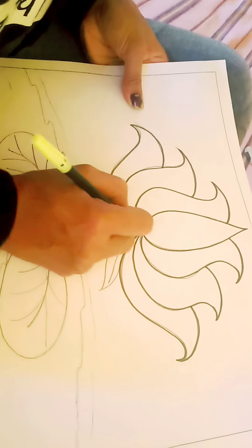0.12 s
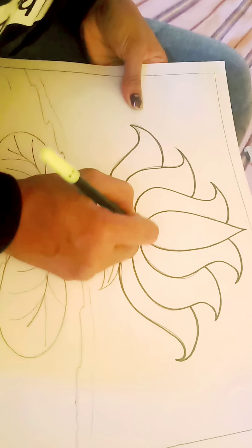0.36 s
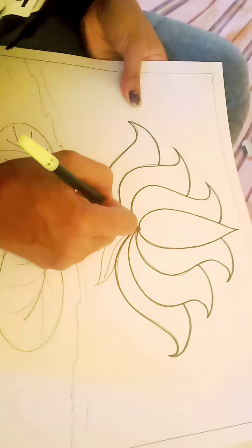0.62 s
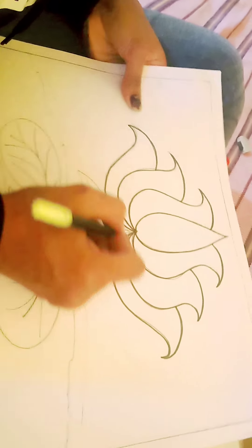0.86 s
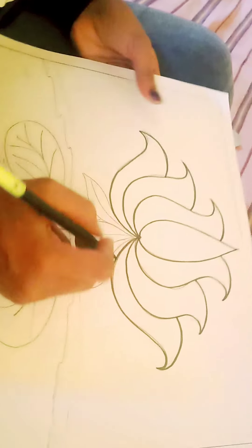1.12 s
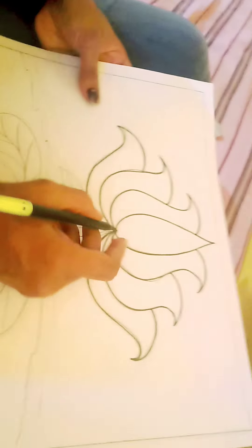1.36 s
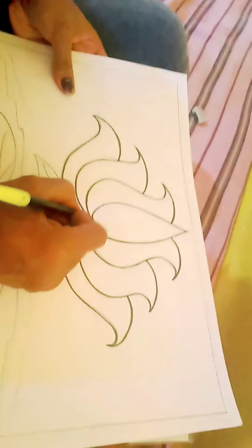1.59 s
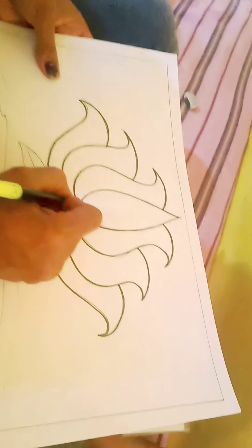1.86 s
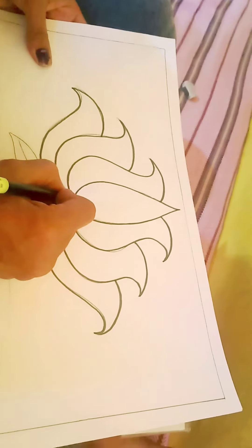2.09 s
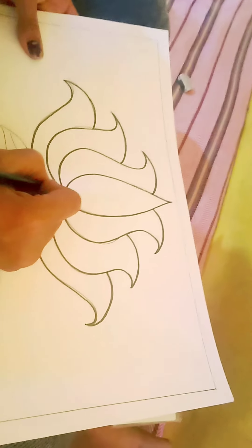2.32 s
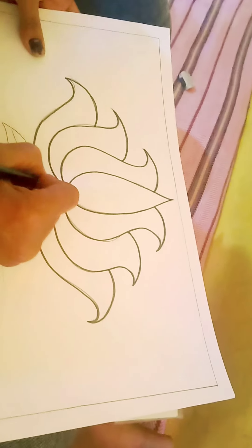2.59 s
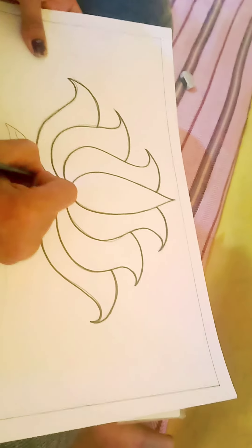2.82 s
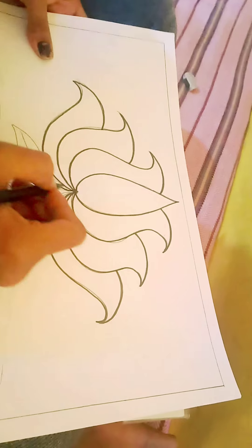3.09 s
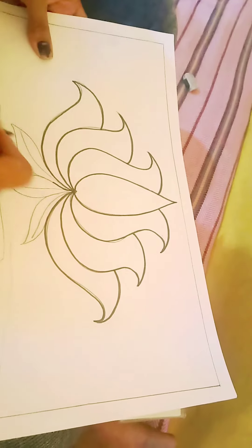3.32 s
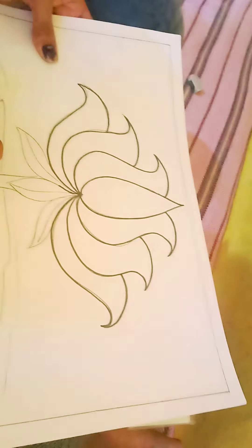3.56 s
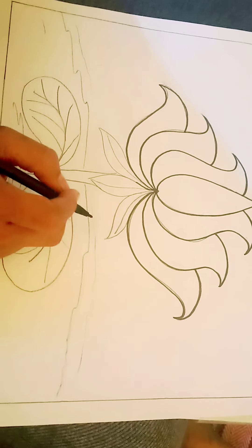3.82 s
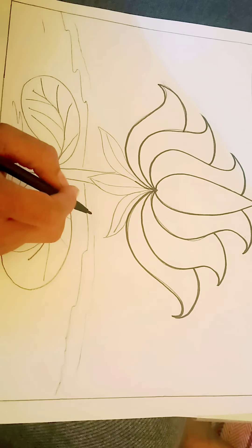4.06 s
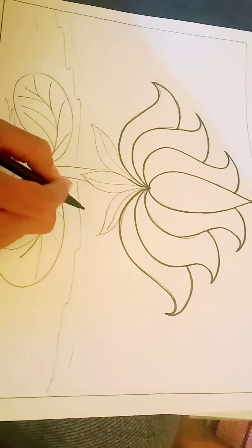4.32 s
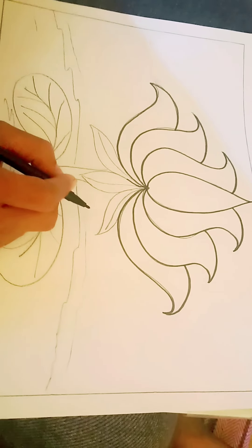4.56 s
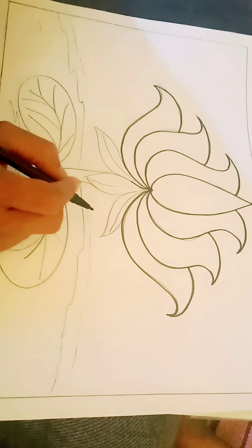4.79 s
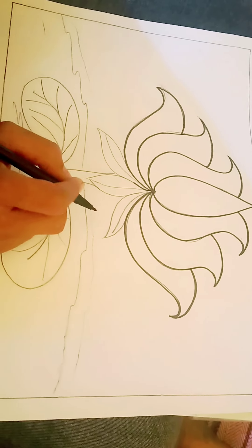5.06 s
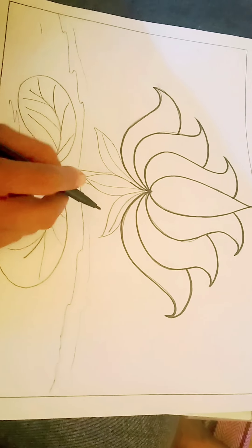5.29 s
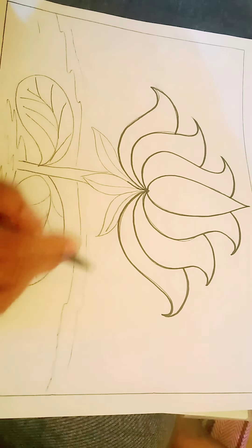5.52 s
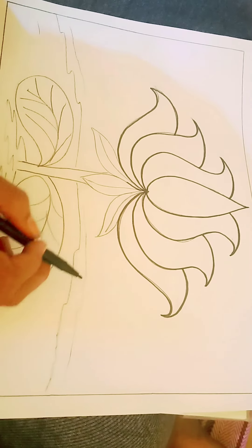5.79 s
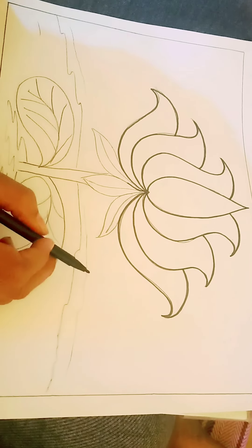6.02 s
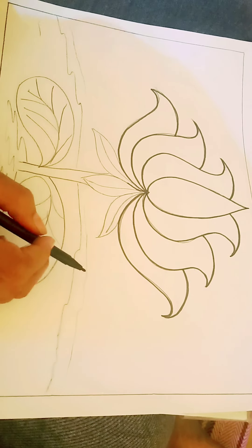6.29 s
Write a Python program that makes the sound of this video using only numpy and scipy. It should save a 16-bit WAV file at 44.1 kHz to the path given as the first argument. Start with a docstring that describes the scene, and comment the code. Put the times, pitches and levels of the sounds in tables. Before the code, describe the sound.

A felt-tip pen scratches softly on a rustling, crackling paper sheet, with dull cloth scuffs and steady shrill insects outside.

```python
"""Felt-tip pen on a lap-held sheet

A felt-tip pen and a hand rub over a drawing sheet, close to two microphone ports: shaped noise in strokes.
The sheet fizzes as it flexes and snaps in short noise bursts; tip and fingers squeak in gliding narrow bands.
Now and then the pad drags over cloth, and shifting weight stirs low resonances of pad and bed.
Insects shrill outside in steady swells of noise near 6 kHz, over a quiet room hush."""
import sys
import numpy as np
from scipy import signal
from scipy.fft import rfft, irfft, next_fast_len
from scipy.io import wavfile
from scipy.ndimage import uniform_filter1d, map_coordinates

SR = 44100
rng = np.random.default_rng(int(sys.argv[2]) if len(sys.argv) > 2 else 0)


def generate_wav(signal):
    """Clip the signal to [-1, 1] and save it as 16-bit WAV at the path in sys.argv[1]."""
    frames = np.transpose(np.atleast_2d(signal))
    scaled = np.clip(frames, -1, 1) * 32767
    pcm = np.round(scaled).astype(np.int16)
    wavfile.write(sys.argv[1], SR, pcm)


def level_to_linear(level):
    """Convert decibel levels to linear amplitude factors, elementwise."""
    exponent = np.asarray(level, float) / 20
    return 10 ** exponent


N = 282151  # length in samples


def unit(x):
    """Scaled to rms 1."""
    return x / np.sqrt(np.mean(x ** 2) + 1e-20)


def along(points, hz):
    """Values at hz, read from (Hz, value) points on a log frequency axis."""
    point_hz, value = np.transpose(points)
    return np.interp(np.log(hz + 1), np.log(point_hz + 1), value)


def curves(rows):
    """One value per sample for each column after the time."""
    s, *columns = np.transpose(rows)
    return [np.interp(np.arange(N) / SR, s, column) for column in columns]


def wobble(rate):
    """A smooth random curve, rate knots a second."""
    knots = rng.standard_normal(int(N * rate / SR) + 4)
    return map_coordinates(knots, [np.arange(N) * rate / SR])


def filtered(x, response):
    """x times a complex response of frequency."""
    m = next_fast_len(x.shape[-1] + 8192)
    spectrum = rfft(x, m) * response(np.fft.rfftfreq(m, 1 / SR))
    return irfft(spectrum, m)[..., :x.shape[-1]]


def colour(spectrum):
    """Gain over frequency of (Hz, dB) points."""
    return lambda hz: level_to_linear(along(spectrum, hz))


def modes(table):
    """Gain over frequency of (Hz, width Hz, dB) resonances, each applied twice for dark valleys."""
    def gain(f):
        return np.abs(sum(level_to_linear(db) * (f * w / (c * c - f * f + 1j * f * w)) ** 2 for c, w, db in table))
    return gain


def placed(db, pan_db):
    """Left and right gains of an unrelated pair with that mid level and left-over-right balance."""
    left = 2 * level_to_linear(db) / np.sqrt(1 + level_to_linear(-2 * pan_db))
    return np.array([left, left * level_to_linear(-pan_db)])


def effort(start, rise_s, length, db, fade_db_s, release_db_s, rest_db):
    """Level in dB of overlapping gestures: each rises, fades while it lasts, then lets go."""
    t = np.arange(0, N + 64, 64) / SR  # one level every 64 samples
    start, rise_s, length, db, fade_db_s = (
        np.reshape(v, (-1, 1)) for v in (start, rise_s, length, db, fade_db_s))
    since = t - start
    faded_db = fade_db_s * np.clip(since - rise_s, 0, length)
    released_db = release_db_s * np.maximum(since - length, 0)
    shape = level_to_linear(db - faded_db - released_db)
    power = (np.clip(since / rise_s, 0, 1) ** 2 * shape) ** 2
    level_db = 10 * np.log10(power.sum(axis=0) + level_to_linear(2 * rest_db))
    return np.interp(np.arange(N) / SR, t, level_db)


# how alike coloured noise is at the two ports: pitch_hz, likeness (correlation, 0..1)
PORT_LIKENESS = [(130, .97), (290, 0.78), (640, 0.57), (1400, 0.033)]


def rush(gain, patchy_db, grain_db):
    """Stereo coloured noise of rms 1: uneven grain, patches of random gain, alike only in the bass."""
    grains = rng.standard_normal((2, N)) * level_to_linear(grain_db * wobble(400))
    z = signal.stft(grains, nperseg=512)[2]
    field = rng.standard_normal(z.shape[1:])
    field = uniform_filter1d(uniform_filter1d(field, size=2, axis=0), size=14, axis=1)
    pair = signal.istft(z * level_to_linear(patchy_db * unit(field)), nperseg=512)[1][:, :N]

    def mid_side(hz):
        turn = np.arccos(np.clip(along(PORT_LIKENESS, hz), -1, 1)) / 2
        return gain(hz) * np.array([np.cos(turn), np.sin(turn)])

    mid, side = filtered(pair, mid_side)
    return unit(np.array([mid + side, mid - side]))


# where the hand works, heard as the left port's lead: time_s, left_over_right_db
HAND_PATH = [(0.0, 38), (0.8, 35), (1.0, 18.5), (1.6, 25), (1.9, 52), (2.4, 34), (3.0, 44), (3.55, 34),
             (3.9, 18), (4.45, 22), (4.6, 8.5), (4.78, 29.5), (5.3, 13), (5.5, 8.5), (5.95, 10.5), (6.1, 6),
             (6.4, 22)]


def hand_pan(s):
    """Left-over-right balance in dB at time s, following the hand across the sheet."""
    return np.interp(s, *np.transpose(HAND_PATH))


# strokes of pen and hand: start_s, length_s, level_db, upper_over_lower_db, fade_db (over the length)
PEN_STROKES = [(-0.03, .3, -59.5, 10, 5.5), (0.288, .27, -76.5, 20.5, 7), (.45, 0.1, -67, -4, 14),
               (0.62, 0.23, -80, 14.5, -23.5), (0.832, 0.45, -59, 15, 14), (1.235, 0.52, -56, 11, 13),
               (1.726, 0.13, -70, 6.5, 1), (1.857, 0.051, -64, 6, 3), (1.943, 0.13, -68, 10, 5),
               (2.22, 0.42, -63.5, 7, 3), (2.398, 0.19, -50, 11.5, 9.5), (2.595, .25, -59, 6, 5),
               (2.877, 0.36, -71.5, 5.5, -5), (3.313, 0.28, -49.5, -5.5, 21), (3.572, 0.18, -68.5, -0.5, 7),
               (3.877, 0.32, -66.5, 4.5, 8), (4.26, 0.406, -66, -15, -8.5), (4.561, 0.092, -54.5, 4, 6),
               (4.685, 0.53, -59, -13.5, 5), (5.216, .25, -58, -4.5, 4.5), (5.458, 0.44, -52, -17, 7.5),
               (6.055, 0.59, -51, -4.5, 34.5)]
# lower band of pen and paper: pitch_hz, relative_level_db
LOWER_BAND = [(500, -72), (1000, -27), (1500, -12), (1900, -4), (2500, -4.5), (3000, -4.5), (3400, -29.5)]
# upper band of pen and paper: pitch_hz, relative_level_db
UPPER_BAND = [(2600, -30), (3100, -2.5), (3500, 5.5), (3900, 9.5), (4400, 0), (4800, -1.5), (5600, -15)]


def rub():
    """Felt and skin catch on the fibres in two noise bands; each stroke sets its own upper band."""
    start, length, db, upper_db, fade_db = np.transpose(PEN_STROKES)

    def level(db, rest_db):
        return level_to_linear(effort(start, 0.054, length, db, fade_db / length, release_db_s=162, rest_db=rest_db))

    lower = level(db, -84.5) * rush(colour(LOWER_BAND), patchy_db=3.5, grain_db=1.5)
    upper = level(db + upper_db, -84) * rush(colour(UPPER_BAND), patchy_db=2.5, grain_db=1.0)
    return placed(1.56 * wobble(12), curves(HAND_PATH)[0]) * (lower + upper)


# the sheet flexes: start_s, length_s, level_db, fade_db (over the length)
SHEET_FLEXES = [(.0, 0.22, -67, -9), (0.352, 0.21, -68, -12), (.66, .2, -68, -18.5), (.84, .83, -50.5, 4),
                (1.684, 0.12, -59.5, 4), (1.906, 0.35, -74, -7.5), (2.417, 0.12, -58, 17),
                (3.304, 0.26, -78, -18), (3.596, 0.17, -65, 4), (4.575, 0.144, -58, 15.5),
                (5.245, 0.088, -59, 11.5), (5.45, 0.33, -64.5, 8), (6.064, 0.098, -60, 1)]
# crisp treble of paper: pitch_hz, relative_level_db
CRISP_BAND = [(4500, -58), (5600, -5.5), (6800, -7.5), (9000, -3.5), (13000, -0.5), (15700, -6)]


def rustle():
    """The flexing sheet fizzes: grainy treble noise that rises and lets go with each flex."""
    start, length, db, fade_db = np.transpose(SHEET_FLEXES)
    level_db = effort(start, 0.023, length, db, fade_db / length, release_db_s=180, rest_db=-81)
    pan_db = curves(HAND_PATH)[0] - 9.5
    return placed(level_db, pan_db) * rush(colour(CRISP_BAND), patchy_db=1.5, grain_db=1.5)


# loudness of the insects: time_s, level_db
INSECT_LEVEL = [(0.0, -52), (2.55, -53.5), (2.92, -55.5), (4.78, -53), (5.06, -56.5), (6.4, -56)]
# small irregular timing offsets of the swells: time_s, offset_cycles
SWELL_OFFSETS = [(0, -0.12), (2.4, 0.06), (3.4, -0.09), (6.4, 0.043)]
# colour of the chorus: pitch_hz, relative_level_db
INSECT_BAND = [(5200, -37), (5630, -8.5), (6090, 2), (6470, -4), (6760, -26.5), (7100, -24.5),
               (11000, -44.5), (12300, -23.5), (13500, -56)]


def insects():
    """A chorus near 6 kHz: wing strokes blurred together, swelling eight times a second."""
    t = np.arange(N) / SR
    swell_db = 3.7 * np.cos(2 * np.pi * (8.24 * t + curves(SWELL_OFFSETS)[0]))
    stroke_hz = 97 + 3 * wobble(6)
    strokes_db = 2.5 * np.cos(2 * np.pi * np.cumsum(stroke_hz) / SR)
    chorus = rush(colour(INSECT_BAND), patchy_db=1.2, grain_db=1.2)
    return placed(curves(INSECT_LEVEL)[0], pan_db=15.5) * unit(level_to_linear(swell_db + strokes_db) * chorus)


# colour of the quiet room: pitch_hz, relative_level_db
HUSH_BAND = [(30, -13), (60, 14), (130, 2), (300, -26), (1300, -15), (2400, -15.5), (4000, -27),
             (5000, -50.5), (7500, -20), (10000, -69), (13000, -38), (16000, -17)]


def room_hush():
    """Steady, nearly even noise, strongest in the bass."""
    return level_to_linear(-87.0) * rush(colour(HUSH_BAND), patchy_db=1.0, grain_db=0.5)


# the pad drags over cloth: start_s, rise_s, length_s, level_db, fade_db (over the length)
PAD_DRAGS = [(0.095, 0.12, 0.21, -73, 8), (1.3, 0.043, 0.14, -48.5, 13.5), (1.863, 0.018, 0.05, -66, 4),
             (2.19, 0.15, 0.33, -68, -2), (2.415, 0.0095, 0.46, -39.5, 29.5),
             (3.319, 0.0079, 0.26, -42, 21), (4.44, 0.16, .35, -65.5, 27),
             (6.072, 0.097, 0.29, -46.5, 24.5)]
# resonances of the sheet: pitch_hz, width_hz (of one pass), relative_level_db
SHEET_MODES = [(408, 177, 4.5), (452, 25, 2.5), (600, 130, 5), (810, 80, 5.5), (890, 31, 6),
               (1025, 130, 1.5), (1316, 110, -1)]
# hiss of the whole sheet: pitch_hz, relative_level_db
SWISH_BAND = [(250, -25), (500, 2.5), (1400, 2), (4200, -1.5), (6000, -19.5), (9500, -17), (12000, -48)]


def drag():
    """The pad scuffs the cloth, noise through the sheet's modes, and the whole sheet hisses along."""
    start, rise_s, length, db, fade_db = np.transpose(PAD_DRAGS)
    level_db = effort(start, rise_s, length, db, fade_db / length, release_db_s=259, rest_db=-79.5)
    level_db = level_db + 2.0 * wobble(24.97)
    scuff = level_to_linear(level_db) * rush(modes(SHEET_MODES), patchy_db=3, grain_db=2)
    hiss_db = level_db + [[3], [-4]]  # left, right
    return scuff + level_to_linear(hiss_db) * rush(colour(SWISH_BAND), patchy_db=2, grain_db=0.16)


# narrow squeaks and hollow rubs of tip and fingers: start_s, length_s, first_hz, last_hz, level_db
TIP_SQUEAKS = [(0.575, 0.067, 420, 410, -67.5), (1.855, .068, 810, 810, -59.5),
               (1.963, 0.033, 2024, 1930, -62.5), (2.196, 0.015, 2540, 2440, -49.5),
               (2.21, .035, 2120, 2050, -51), (2.213, 0.02, 3560, 3450, -41.5),
               (2.825, 0.042, 4500, 4540, -64), (2.861, 0.072, 4400, 3910, -53.5),
               (2.923, 0.18, 2595, 2640, -68.5), (3.035, 0.19, 2684, 3620, -62),
               (3.241, .08, 447, 440, -73.5), (3.247, 0.097, 3460, 3460, -66.5),
               (3.873, 0.087, 678, 663, -72.5), (3.977, 0.087, 3310, 4680, -58),
               (4.035, 0.149, 3590, 3370, -57.5), (4.402, 0.17, 768, 800, -72.5),
               (4.585, .1, 3064, 3190, -50.5), (4.795, 0.238, 1920, 2040, -59),
               (4.72, 0.096, 1080, 1027, -72.5), (5.019, .12, 3760, 3730, -65),
               (5.162, 0.018, 1730, 1900, -54), (5.445, 0.069, 3630, 2590, -57),
               (5.528, .1, 2740, 2910, -52.5), (5.545, 0.024, 867, 860, -55.5),
               (5.546, 0.017, 623, 600, -47), (5.613, 0.11, 3060, 3540, -56.5),
               (5.617, 0.26, 635, 616, -72.5), (5.692, 0.26, 3400, 3430, -66.5),
               (6.24, .155, 820, 782, -68)]


def squeaks():
    """Stick-slip in a small cavity: a narrow band of noise that glides."""
    out = np.zeros((2, N))
    stutter = level_to_linear(2 * wobble(45))  # how unevenly it catches
    for start, length, first_hz, last_hz, db in TIP_SQUEAKS:
        u = np.linspace(0, 1, round(length * SR))
        noise = rng.standard_normal((2, 2, SR // 2))[..., :len(u)]
        width_hz = 0.07 * first_hz + 2 / length
        slow = unit(filtered(noise, lambda hz: 1 / (1 + (2 * hz / width_hz) ** 4)))
        phase = 2 * np.pi * np.cumsum(first_hz + (last_hz - first_hz) * u) / SR
        band = slow[0] * np.cos(phase) + slow[1] * np.sin(phase)
        swell = np.minimum(1, 12 * u) * np.minimum(1, 3 * (1 - u))
        pan_db = (hand_pan(start) - 7) * (first_hz > 1500)  # low squeaks are equally loud at both ports
        out[:, round(start * SR):][:, :len(u)] += placed(db, pan_db)[:, None] * swell * band
    return out * stutter


# how fast the room dies away: pitch_hz, t60_s
ROOM_DECAY = [(300, 0.26), (3000, 0.1), (12000, 0.12)]


def room(x):
    """The walls answer with a noise tail in which each frequency dies at its own speed."""
    hz, t, z = signal.stft(rng.standard_normal((2, SR // 3)), SR, nperseg=256)
    decay = level_to_linear(-60 * t / along(ROOM_DECAY, hz)[:, None])
    tail = signal.istft(z * decay, SR, nperseg=256)[1]
    delayed = np.pad(x, ((0, 0), (200, 0)))  # samples until the first answer
    return signal.fftconvolve(delayed, tail / np.linalg.norm(tail[0]), axes=1)[:, :N]


# paper snaps: time_s, strength_db (before a common cut), crisp_over_body_db (before a common lift), t60_s
PAPER_SNAPS = [(0.8921, -8, -36, 0.016), (1.0242, -24, -11, 0.006), (1.043, -14, -32, 0.012),
               (1.0468, -16.5, -18, 0.014), (1.1095, -36, 5, 0.0082), (1.1296, -18, -22, 0.011),
               (1.1524, -16, -13.5, 0.01), (1.275, -24.5, -3.5, 0.009), (1.287, -20.5, -16, 0.017),
               (1.4134, -19, -11.5, 0.015), (1.5883, -8, -10, 0.016), (1.5974, -33, 8, 0.014),
               (1.89, -29, -41.5, 0.021), (1.9088, -32.5, -55, 0.08), (2.92, -38.5, -12.5, 0.015),
               (3.541, -30, -29.5, 0.013), (3.5575, -19, -28, 0.017), (3.5657, -17, -16.5, 0.0033),
               (3.6914, -25, -1, 0.013), (4.777, -35.5, -2, 0.018), (4.802, -47, -1, 0.023),
               (5.2795, -25.5, -14.5, 0.039), (5.4765, -26, 5, 0.0043), (5.481, -38, 8, 0.018),
               (5.502, -13, -15, 0.018), (5.5473, -21, -23, 0.026), (5.5566, -28.5, -14.5, 0.025),
               (5.6085, -35, -7.5, 0.015), (5.7346, -28, -15, 0.02)]


def snaps():
    """A fold gives way in a burst; harder snaps have a stronger upper body band, crispness is set one by one."""
    lead = 128  # samples of silence before a snap, room for its filters
    low_hz = 1290  # a fold is too small to radiate below this
    out = np.zeros((2, N + SR))
    t = np.arange(SR // 8) / SR
    for s, db, crisp_db, t60 in PAPER_SNAPS:
        noise = rng.standard_normal((2, 3, len(t)))
        burst = noise[:, :2] + 0.83 * noise[:, 2:]  # the last part reaches both ports alike
        burst = np.roll(burst * level_to_linear(-60 * t / t60), lead, axis=-1)
        upper_db = 4 + 0.68 * (db + 11.5)  # grows with the strength of the snap

        def body_gain(hz):
            lower = colour(LOWER_BAND)(hz) / (1 + (low_hz / (hz + 1)) ** 4)
            return lower + level_to_linear(upper_db) * colour(UPPER_BAND)(hz)

        body = filtered(burst[0], body_gain)
        crisp = level_to_linear(crisp_db + 12.5) * filtered(burst[1], colour(CRISP_BAND))
        gains = placed(db - 10.0, hand_pan(s) - 3.5)[:, None]
        out[:, round(s * SR) - lead:][:, :len(t)] += gains * (body + crisp)
    return out[:, :N]


# weight shifts on the bed: start_s, length_s, knock_level_db, rumble_level_db, deep_level_db
WEIGHT_SHIFTS = [(1.3, 0.14, -46.5, -40.5, -44.5), (1.539, 0.11, -67.5, -66, -62),
                 (1.694, 0.14, -52, -51, -59), (1.756, 0.078, -68, -49.5, -55),
                 (1.794, 0.31, -71, -55.5, -54.5), (2.04, 0.098, -54, -52.5, -57),
                 (2.125, 0.14, -75, -54, -47), (2.17, 0.054, -74, -45, -58), (2.393, 0.21, -50, -37.5, -41),
                 (2.552, .3, -57, -54.5, -45.5), (2.846, 0.098, -81, -53, -66),
                 (3.306, 0.25, -49, -49.5, -51), (3.707, 0.064, -87, -74, -56.5),
                 (4.537, 0.13, -82, -62.5, -65), (4.927, 0.054, -95, -56.5, -60),
                 (6.078, 0.19, -40, -46, -65), (6.207, 0.14, -43, -48.5, -63), (6.314, 0.12, -61, -65, -66)]
# the pad's lowest modes: pitch_hz, width_hz (of one pass), relative_level_db
PAD_MODES = [(214.6, 19, 1.5), (247, 63, -1), (295.2, 29, -7)]
# low modes of the bed, deepest first: pitch_hz, width_hz (of one pass), relative_level_db
BED_MODES = [(70.9, 18, 3), (104, 9.6, 2.5), (135.1, 37.5, 3)]


def bumps():
    """Weight stirs the low modes of pad and bed, much alike at both ports; the deeper, the slower to rise."""
    start, length, knock_db, rumble_db, deep_db = np.transpose(WEIGHT_SHIFTS)

    def level(db, rise_s, fade_db, rest_db):
        return level_to_linear(effort(start, rise_s, length, db, fade_db / length, release_db_s=264, rest_db=rest_db))

    knock = level(knock_db, rise_s=0.036, fade_db=11.5, rest_db=-81)
    rumble = level(rumble_db, rise_s=0.061, fade_db=11, rest_db=-75.5)
    deep = level(deep_db, rise_s=0.098, fade_db=12.5, rest_db=-75)
    out = knock * rush(modes(PAD_MODES), patchy_db=3.5, grain_db=2.0)
    out = out + rumble * rush(modes(BED_MODES[1:]), patchy_db=3.5, grain_db=4.5)
    return out + deep * rush(modes(BED_MODES[:1]), patchy_db=3.5, grain_db=1.0)


def scene():
    """Sheet, pen, pad and insects over the room's hush; the walls answer snaps and squeaks only."""
    close = squeaks() + snaps()
    hand = rub() + rustle() + drag() + bumps()
    return close + level_to_linear(-10.0) * room(close) + hand + insects() + room_hush()


# cavity peaks and notches of the left port: pitch_hz, width_hz, gain_db
LEFT_CAVITY = [(2400, 820, 6), (4010, 540, -5), (4900, 266, -26), (8380, 10800, -3.5), (12600, 900, -3)]
# cavity peaks and notches of the right port: pitch_hz, width_hz, gain_db
RIGHT_CAVITY = [(4900, 4000, 0), (7820, 2130, 16.5), (12300, 3500, -6.5)]


def ports(dry):
    """Each port's cavity lifts and cancels its own bands."""
    def bell(f, c, w, g):
        return (c * c - f * f + 1j * f * w * g) / (c * c - f * f + 1j * f * w / g)

    def cavity(f, table):
        return np.prod([bell(f + 1, c, w, level_to_linear(db / 2)) for c, w, db in table], axis=0)

    return filtered(dry, lambda f: np.array([cavity(f, LEFT_CAVITY), cavity(f, RIGHT_CAVITY)]))


def band_limited(x):
    """A steep band limit: everything from 15.9 kHz up is cut by 45 dB."""
    return filtered(x, lambda f: np.where(f < 15900, 1, level_to_linear(-45)))


def roll_off(x):
    """The treble ends steeply here."""
    return signal.sosfilt(signal.butter(12, 16810, fs=SR, output="sos"), x)


def record(dry):
    """The scene as the two ports hear it, band-limited."""
    mix = band_limited(ports(dry))
    return roll_off(mix)


dry = scene()
out = record(dry)
generate_wav(out)
```